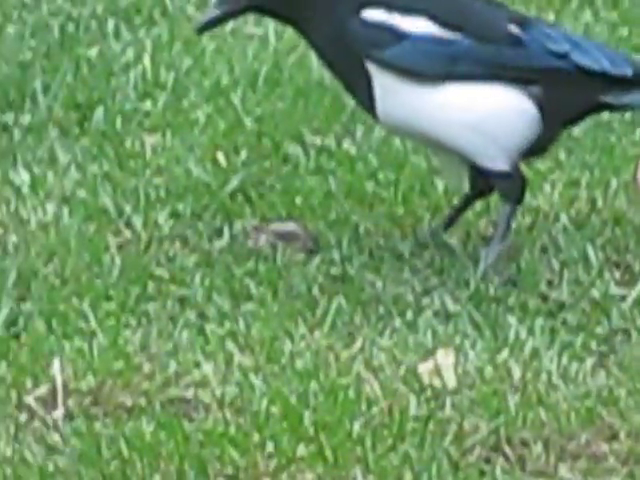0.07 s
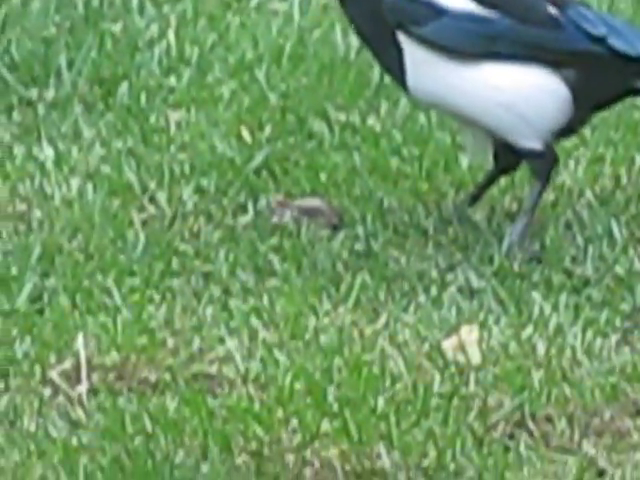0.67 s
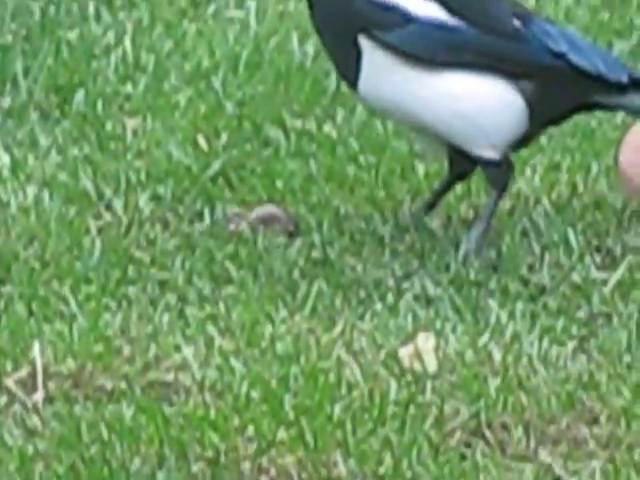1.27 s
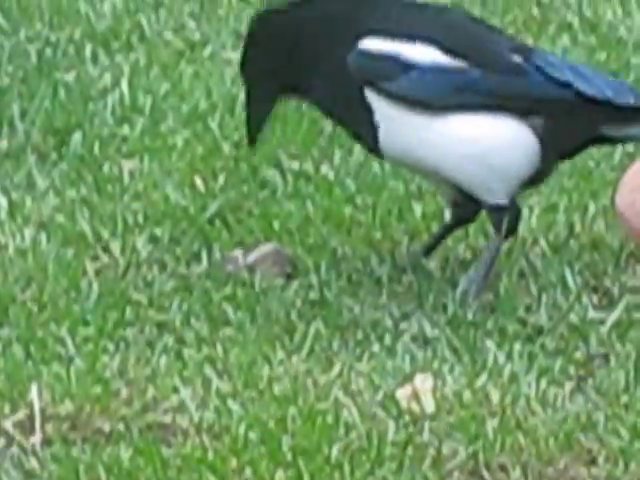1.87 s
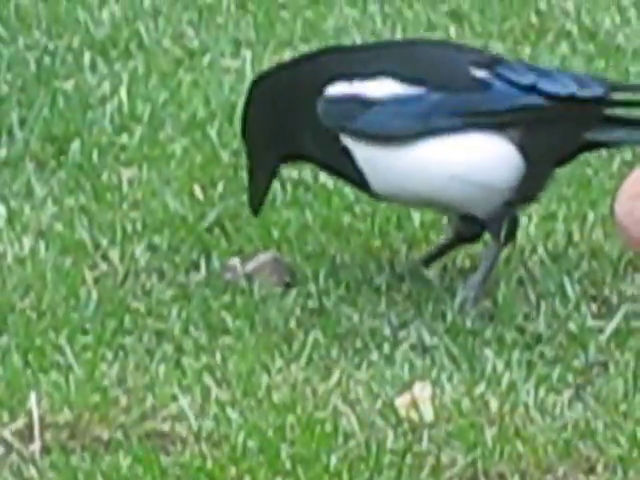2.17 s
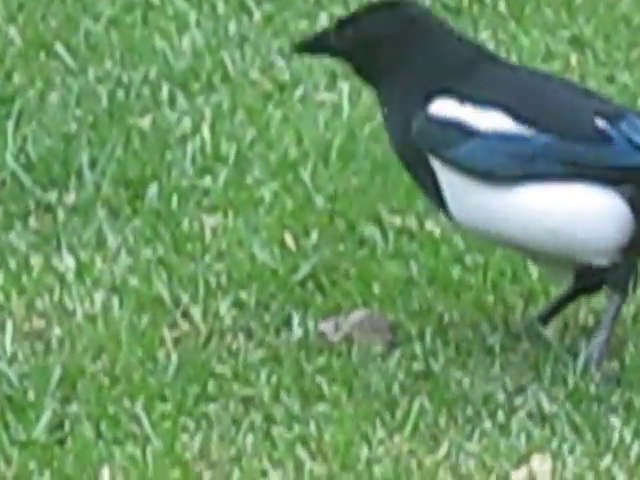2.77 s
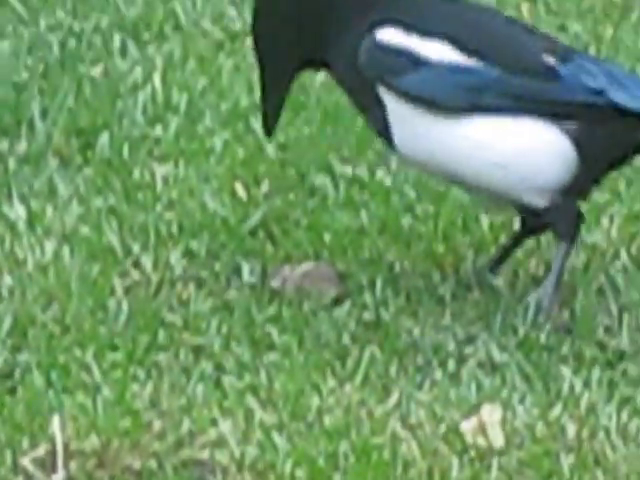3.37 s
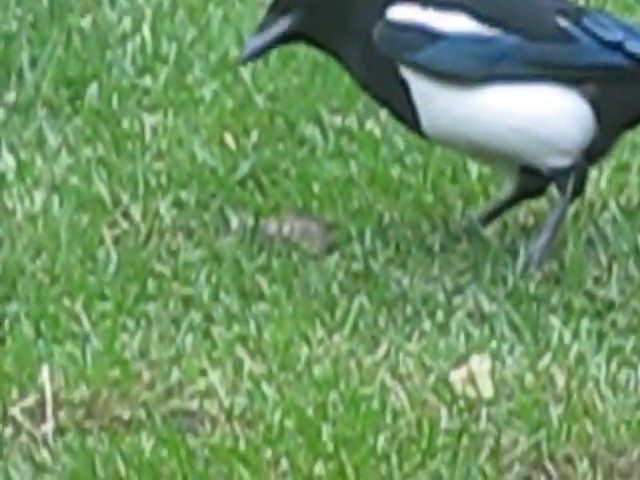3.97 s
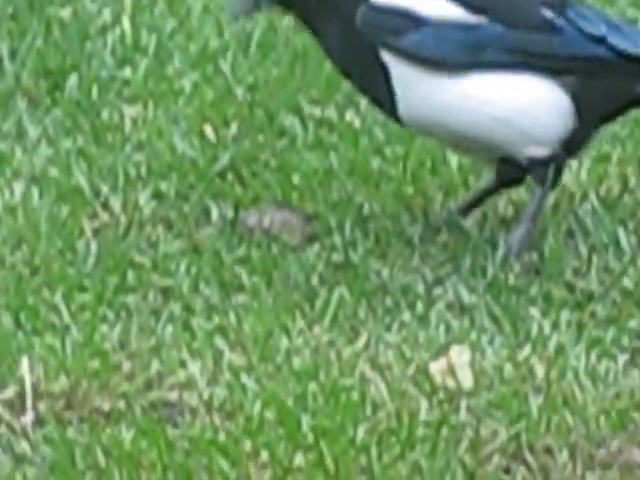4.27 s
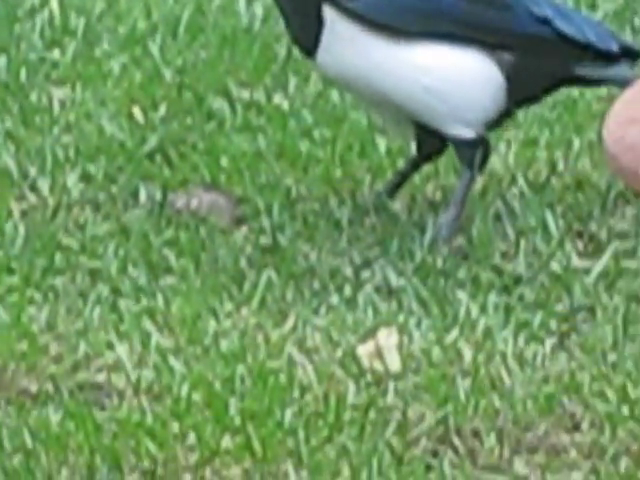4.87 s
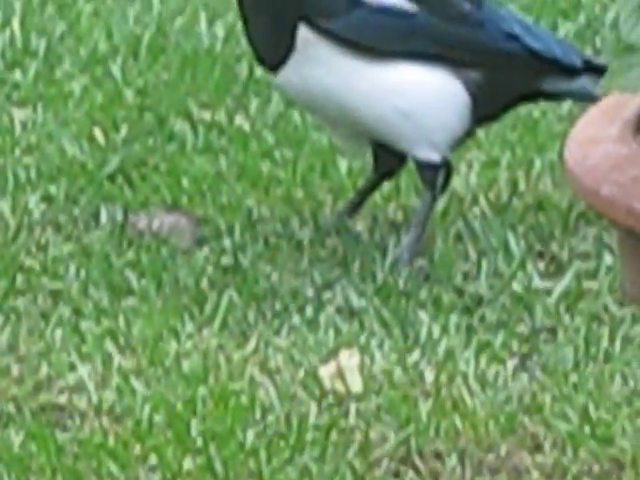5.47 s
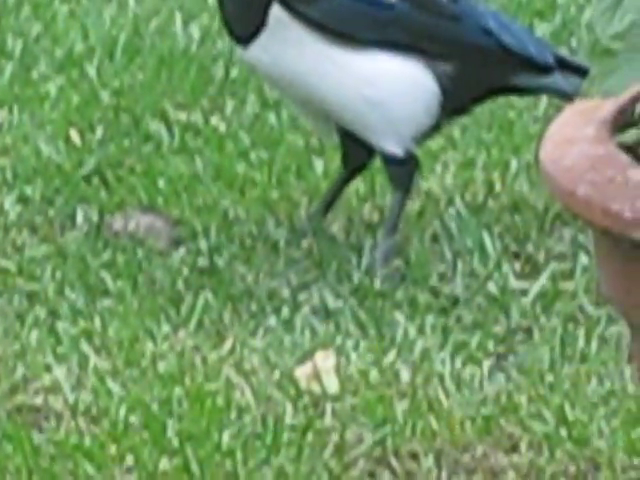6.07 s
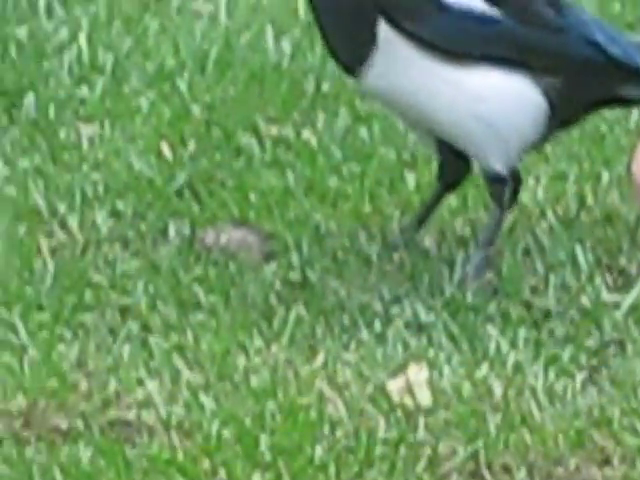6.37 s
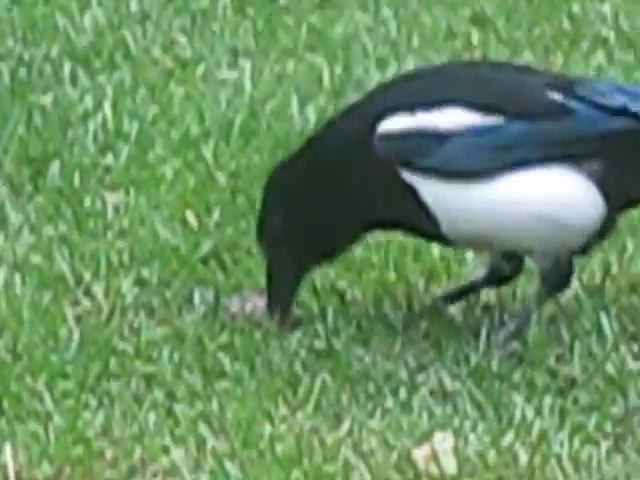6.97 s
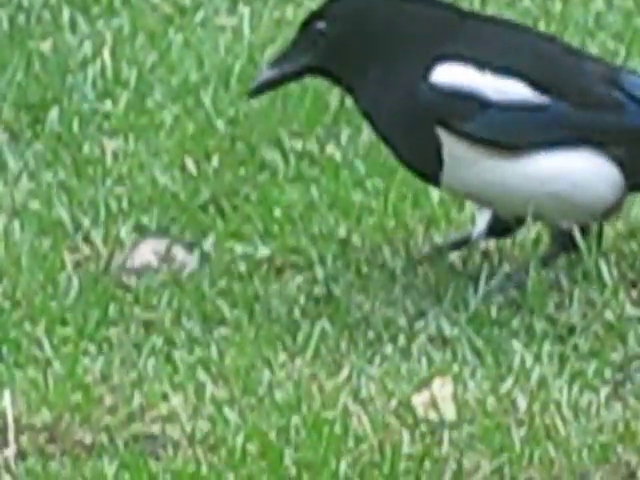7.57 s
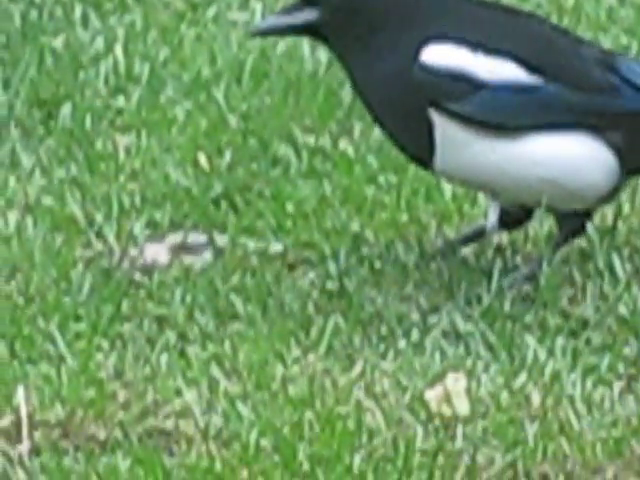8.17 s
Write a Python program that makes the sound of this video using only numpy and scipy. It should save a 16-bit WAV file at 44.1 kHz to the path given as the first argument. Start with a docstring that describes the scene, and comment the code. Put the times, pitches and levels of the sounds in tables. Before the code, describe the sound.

A hand-held camera hums and whirs steadily, very close, over the low hiss of a quiet lawn. About two seconds in, fingers shift their grip right at the microphone: a few dull bumps, one sharp plastic click and a short scrape of skin. Another click and a softer rub follow a second later. Near six seconds comes a small cluster of lighter clicks and bumps, then only the hum and hiss remain.

```python
"""A steady hum and whir, very close, over the low outdoor hiss of a quiet lawn.
The microphone sits in a hand-held camera: its mechanism hums, its cavities lift the hiss into a whir.
Right at the microphone, fingers shift their grip: the plastic shell clicks and rings,
the whole camera rocks with dull bumps, and skin slides across it in short scrapes."""
import sys
import numpy as np
from scipy import signal
from scipy.fft import rfft, irfft, next_fast_len
from scipy.io import wavfile

SR = 44100
rng = np.random.default_rng(int(sys.argv[2]) if len(sys.argv) > 2 else 0)


def unload_audio(sound):
    """Save the sound as a 16-bit wav file, at the path given as the first command line argument."""
    columns = np.transpose(np.atleast_2d(sound))
    # keep every value between -1 and 1, then stretch to whole-number steps
    steps = np.round(np.clip(columns, -1, 1) * 32767)
    wavfile.write(sys.argv[1], SR, steps.astype(np.int16))


N = 362502
TIME = np.arange(N) / SR

# outdoor hiss, before the cavities colour it: f/Hz, level/dB per Hz
HISS_SPECTRUM = [(20, -91), (55, -82), (130, -85), (235, -79), (370, -83.5), (560, -78.5), (1080, -88.5),
                 (2000, -92), (2800, -91), (3300, -96.5), (4700, -100.5), (6500, -103.5), (9500, -106.5),
                 (16000, -113)]
# resonances that lift narrow bands of the hiss into a steady whir: f/Hz, width/Hz, boost/dB
CAVITY_MODES = [(734.8, 91, 13), (1194, 99, 9.5), (1362, 60, 8), (1619.5, 235, 20), (2303, 260, 4),
                (3010, 210, 4), (3890, 340, 6)]
# steady tones of the mechanism: f/Hz, rms level/dB, wavering share (0 to 1)
MOTOR_TONES = [(393.8, -46.5, .02), (55, -76.5, 1), (274.8, -67.5, 0.54), (448.2, -63.5, 0.73),
               (494, -63.5, 0.52), (946, -72.5, 0.22), (1908, -75, 0.3)]
# ringing of the plastic shell around the microphone: f/Hz, width/Hz, boost/dB
SHELL_MODES = [(1610, 410, 9.5), (2150, 150, 4.5), (2635, 290, 5), (2860, 150, 4.5), (3680, 530, 8),
               (4300, 220, 5.5), (4740, 290, 2), (6500, 700, 9), (9440, 4100, 10.5), (12400, 1200, 1)]
# resonances of the panel under the sliding finger: f/Hz, width/Hz, boost/dB
PANEL_MODES = [(2890, 180, 5), (3730, 200, 2.5)]
# strokes of a finger on the case: t/s at full pressure, swell/s, hold/s, friction level/dB
FINGER_STROKES = [(2.327, 0.092, 0.017, -33.5), (2.379, 0.097, 0.02, -37.5), (2.451, 0.055, 0.048, -37.5),
                  (2.6, 0.063, .012, -56), (3.427, .12, 0.2, -44.5)]
# contacts of the grip: t/s, click level/dB, thud level/dB, contact cutoff f/Hz, touched spot f/Hz
GRIP_CONTACTS = [(1.3374, -28, -48, 2900, 1750), (2.1548, -46, -33, 1580, 1000),
                 (2.2164, -26, -30, 3500, 2200), (2.229, -26, -27.5, 4200, 3700),
                 (2.2912, -2.5, -29, 11400, 2620), (2.7726, -39.5, -27.5, 4300, 3000),
                 (3.4162, -15, -43, 12500, 4200), (3.6413, -27, -46, 4800, 2780),
                 (5.28, -33, -40, 2700, 1800), (6.017, -33.5, -42, 4300, 3200),
                 (6.172, -35, -32, 1800, 1100), (6.3518, -31, -48, 2800, 2000),
                 (6.3686, -30, -51, 2800, 2000), (6.3703, -24, -36, 3370, 1500),
                 (6.405, -20, -35, 3350, 1290), (6.4064, -21, -24, 3650, 3220)]


def from_db(db):
    """Decibels to gain."""
    return 10 ** (np.asarray(db) / 20)


def rms_one(x):
    """Scale to unit rms."""
    return x / np.sqrt(np.mean(x ** 2) + 1e-20)


def peak_one(x):
    """Scale to unit peak."""
    return x / np.max(np.abs(x))


def cut(x, hz, kind, order=2):
    """Butterworth low- or high-pass."""
    return signal.sosfilt(signal.butter(order, hz, kind, fs=SR, output="sos"), x)


def resonate(x, modes):
    """A chain of resonant boosts, one for each row of f/Hz, width/Hz, boost/dB."""
    for hz, width_hz, boost_db in modes:
        angle = 2 * np.pi * hz / SR
        height = from_db(boost_db / 2)
        damping = np.sin(angle) * width_hz / (2 * hz)
        x = signal.lfilter([1 + damping * height, -2 * np.cos(angle), 1 - damping * height],
                           [1 + damping / height, -2 * np.cos(angle), 1 - damping / height], x)
    return x


def drift(rate_hz):
    """Smooth random motion with unit rms."""
    pole = np.exp(-2 * np.pi * rate_hz / SR)
    smoothed = signal.lfilter([1], [1, -2 * pole, pole ** 2], rng.standard_normal(N + SR))
    return rms_one(smoothed[SR:])


def outdoor_hiss():
    """The open air over the lawn: steady noise, strongest in the lows."""
    hz, level_db = np.transpose(HISS_SPECTRUM)
    size = next_fast_len(N)
    bin_hz = np.maximum(np.fft.rfftfreq(size, 1 / SR), 1)
    bin_db = np.interp(np.log(bin_hz), np.log(hz), level_db)
    gain = from_db(bin_db) * np.sqrt(SR / 2)
    return irfft(rfft(rng.standard_normal(size)) * gain, size)[:N]


def cavity_whir(hiss):
    """Cavities around the microphone lift narrow bands of the hiss into a whir."""
    return resonate(hiss, CAVITY_MODES)


def motor_hum(waver_hz=3.5):
    """Inside the case: one nearly pure motor tone, and weaker ones that waver in level and phase."""
    out = np.zeros(N)
    for hz, level_db, share in MOTOR_TONES:
        waver = (drift(waver_hz) + 1j * drift(waver_hz)) / np.sqrt(2)
        swing = np.sqrt(1 - share ** 2) + share * waver
        tone = np.exp(2j * np.pi * (hz * TIME + rng.random()))
        out += from_db(level_db) * np.sqrt(2) * np.real(swing * tone)
    return out


def shell(force, high_hz, treble_db, low_hz=1900):
    """The plastic passes a middle band to the microphone, with some treble, and rings briefly."""
    force = cut(force, low_hz, "high")
    middle = cut(force, high_hz, "low", order=14)
    treble = from_db(treble_db) * cut(force, high_hz, "high")
    return resonate(middle + treble, SHELL_MODES)


def finger_friction(swell_db=21, sag_db_per_s=12, lift_db_per_s=620):
    """Each stroke presses down, eases during the hold and lifts; the firmest sets the friction in dB."""
    strokes = []
    for full_s, swell_s, hold_s, level_db in FINGER_STROKES:
        age = TIME - full_s
        swell = swell_db * np.minimum(age, 0) / swell_s
        sag = sag_db_per_s * np.maximum(age, 0)
        lift = lift_db_per_s * np.maximum(age - hold_s, 0)
        strokes.append(level_db + swell - sag - lift)
    return np.max(strokes, axis=0)


def skin_slide(soft_hz=3400, grain_db=1.0, grain_hz=150, rasp_db=-30.5, rasp_growth=0.66):
    """Beside the microphone, skin catches and lets go in countless tiny slips that drive the shell."""
    friction_db = finger_friction()
    slips = rng.standard_normal(N) * from_db(grain_db * drift(grain_hz))
    rubbed = resonate(cut(slips, soft_hz, "low"), PANEL_MODES)
    scrape = rms_one(shell(rubbed, high_hz=4900, treble_db=-25.0))
    # an airy rasp comes straight from the skin and grows more slowly with pressure
    airy = cut(rng.standard_normal(N), hz=4400, kind="high")
    rasp = rms_one(cut(airy, hz=8000, kind="low", order=4))
    return from_db(friction_db) * scrape + from_db(rasp_db + rasp_growth * friction_db) * rasp


def grip_knocks(thud_hz=438, thud_width_hz=163, spot_width_hz=900, spot_db=8.0, push_db=-32.0):
    """Each contact snaps the shell and rocks camera and microphone in a low, quickly damped thud."""
    tap = signal.unit_impulse(SR // 20)
    rocking = signal.lfilter(*signal.iirpeak(thud_hz, thud_hz / thud_width_hz, fs=SR), tap)
    thud = peak_one(cut(rocking, hz=750, kind="low"))
    # the flexing wall presses on the air inside
    push = from_db(push_db) * peak_one(cut(tap, hz=180, kind="low"))
    out = np.zeros(N)
    for start_s, click_db, thud_db, contact_hz, spot_hz in GRIP_CONTACTS:
        contact = cut(tap, contact_hz, "low", order=4)   # a softer contact is duller
        touched = resonate(contact, [(spot_hz, spot_width_hz, spot_db)])
        click = peak_one(shell(touched, high_hz=5080, treble_db=-21.5))
        start = round(start_s * SR)
        out[start:start + len(tap)] += from_db(click_db) * (click + push) + from_db(thud_db) * thud
    return out


def scene():
    """At the one microphone: hiss, whir and hum behind, the handling in front."""
    background = cavity_whir(outdoor_hiss()) + motor_hum()
    handling = grip_knocks() + skin_slide()
    return (background + handling)[None, :]


def record(dry, notch_hz=7865, notch_width_hz=1980, cutoff_hz=15800):
    """After the microphone, the camera notches out a treble band and cuts the top steeply."""
    notch = signal.iirnotch(notch_hz, notch_hz / notch_width_hz, fs=SR)
    top_cut = signal.ellip(12, .1, 70, cutoff_hz, fs=SR, output="sos")
    return signal.sosfilt(top_cut, signal.lfilter(*notch, dry))


dry = scene()
out = record(dry)
unload_audio(out)
```